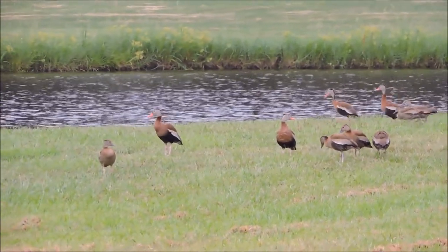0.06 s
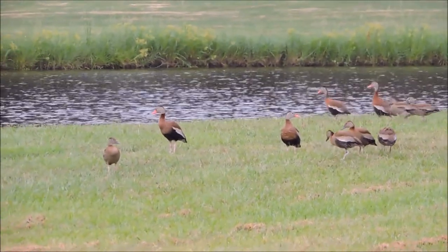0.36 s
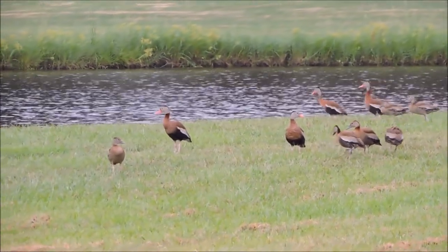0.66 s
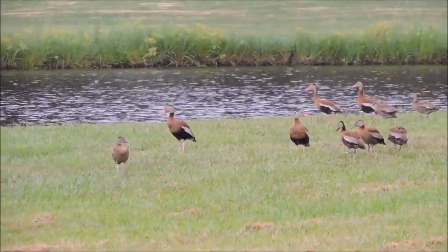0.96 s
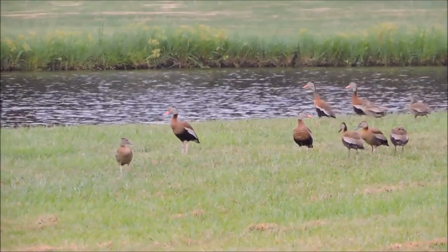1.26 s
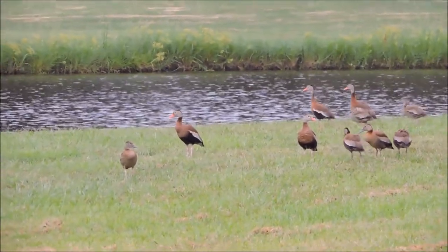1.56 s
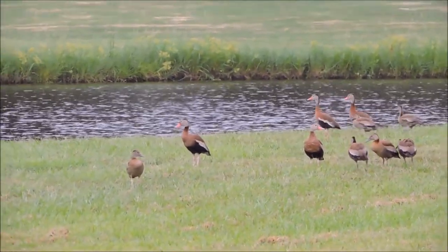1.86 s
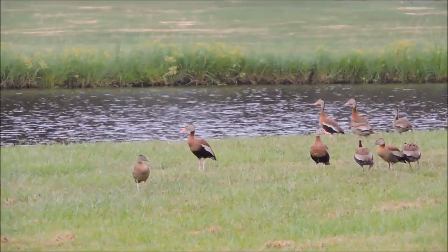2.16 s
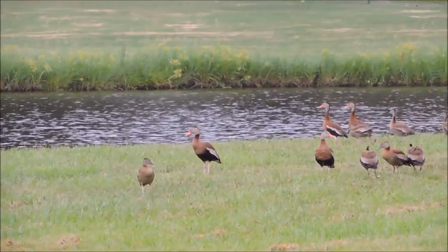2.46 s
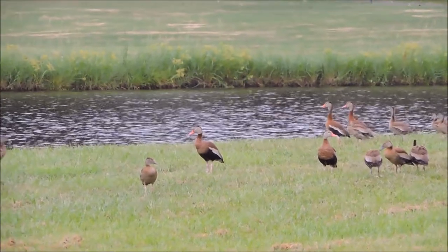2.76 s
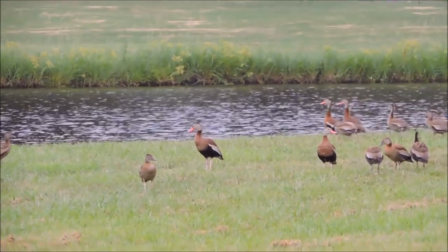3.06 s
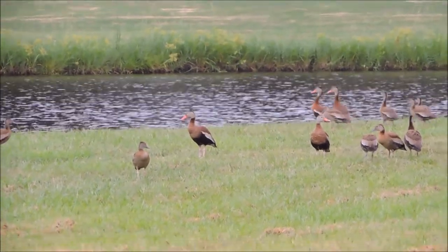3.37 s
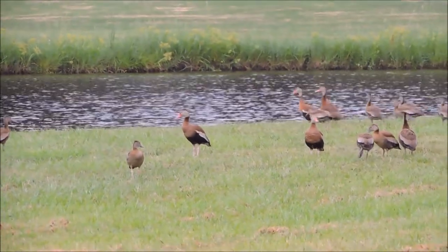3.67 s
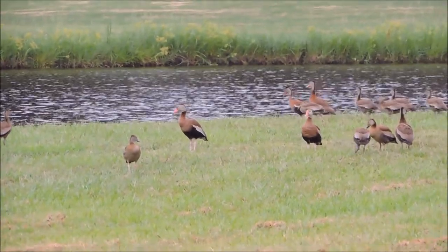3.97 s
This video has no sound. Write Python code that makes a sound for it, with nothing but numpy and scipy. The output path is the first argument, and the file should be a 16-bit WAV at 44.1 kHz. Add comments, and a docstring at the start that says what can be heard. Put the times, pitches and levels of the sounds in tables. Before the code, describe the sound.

A flock of ducks calls on the grass by a pond: quiet peeps, clear wavering whistles, excited squeals, then thin gliding notes. From about a second in, gusts rumble and thump on the microphone, with faint outdoor hiss behind.

```python
"""A flock of whistling ducks on the grass beside a pond opens with soft pips, over faint hiss, insects
and a far hum. Near 0.8 s long whistles begin: each syrinx has two voices, which beat into sum and
difference tones. Gusts soon buffet the microphone, mostly on the left. From 1.9 to 2.6 s an excited
bird's squeals jump between windpipe resonances. Pips and thin gliding notes then close the scene,
while the gusts move toward the middle."""
import sys
import numpy as np
from scipy import signal
from scipy.fft import rfft, irfft, next_fast_len
from scipy.io import wavfile
from scipy.ndimage import uniform_filter1d, map_coordinates

SR = 44100
rng = np.random.default_rng(int(sys.argv[2]) if len(sys.argv) > 2 else 0)


def write(x):
    x = np.atleast_2d(x).T
    wavfile.write(sys.argv[1], SR, np.round(np.clip(x, -1, 1) * 32767).astype(np.int16))


N = 176400

# Noise spectra: (frequency [Hz], relative level [dB])
HISS_SPECTRUM = [(150, -4.5), (400, -2), (950, -12.5), (1450, -12.5), (1950, -20.5), (3700, -21.5),
                 (5000, -28), (9000, -29.5), (11000, -35.5), (15500, -48)]
INSECT_SPECTRUM = [(5900, -23), (6520, -8), (7300, -30.5)]
RUMBLE_SPECTRUM = [(15, -2), (60, 5.5), (135, 0.5), (250, -21), (900, -97)]
FLUTTER_SPECTRUM = [(100, -10), (160, 3.5), (300, -8.5), (600, -30.5), (3000, -100)]
# Swell of the hiss: (time [s], level [dB])
HISS_LEVEL = [(1, -48), (3.2, -45.5)]
# Coherence of the hiss: (frequency [Hz], left-right correlation [ratio])
HISS_COHERENCE = [(60, 1), (700, 0.093)]
# Balance of the hiss: (frequency [Hz], left over right [dB])
HISS_PAN = [(100, -4.5), (1000, 8.5), (2400, 3), (8000, -0.5)]
# Swells of the hum and the breeze: (time [s], level [dB])
HUM_LEVEL = [(0, -67), (.25, -51.5), (1.3, -58.5), (2.2, -46), (2.6, -62.5)]
BREEZE_LEVEL = [(0, -36), (2.5, -26)]
# Gusts: (start [s], length [s], level [dB], left over right [dB])
WIND_GUSTS = [(0.943, 0.037, -28, 16), (1.135, 0.15, -20, 13.5), (1.312, 0.31, -28, 22),
              (1.679, 0.27, -23, 33), (2.04, 0.14, -18, 32), (2.226, 0.11, -19.5, 29),
              (2.591, .16, -15.5, 32), (2.825, 0.283, -18.5, 28), (3.158, 0.12, -21, 8),
              (3.307, 0.1, -18.5, -0.5), (3.654, 0.16, -27.5, -9.5), (3.867, 0.13, -21.5, 1.5)]
# Eddy impacts: (time [s], peak level [dB])
EDDIES = [(1.208, -21.5), (2.166, -14.5), (2.646, -13), (2.752, -15), (2.775, -15.5), (2.82, -10.5),
          (2.914, -10), (3.033, -14.5), (3.113, -14), (3.367, -16)]
# Throat filter: (frequency [Hz], gain [dB])
THROAT_RESPONSE = [(1500, -67), (1950, -21), (2480, -6), (2800, 0.5), (7600, -2.5), (9600, -9),
                   (13500, -2.5), (15500, -25)]
# Source harmonics, from the second upward: (relative level [dB])
WHISTLE_HARMONICS = [3.5, -5.5, -8.5, -20, -19]
PIP_WEE_HARMONICS = [0, 0.67, -17]
SQUEAL_HARMONICS = [-13.5, -29]
# Combination tones: (lower voice [multiple], upper voice [multiple], relative level [dB])
COMBINATION_TONES = [(0, 2, -13), (0, 3, -23), (1, 1, -6), (-1, 2, -10), (2, 1, -15), (2, 0, -8),
                     (3, 0, -13)]
# Single pips: (centre [s], half length [s], top pitch [Hz], lower voice [dB], upper voice [dB])
SINGLE_PIPS = [(0.083, 0.017, 3060, -49, -95), (0.209, 0.011, 2990, -53, -90),
               (.74, 0.043, 3262, -42.5, -39.5), (0.823, 0.025, 4580, -45, -62),
               (3.155, 0.024, 3680, -54, -77), (3.959, 0.024, 7720, -44, -80)]
# Pip-wees: (pip centre [s], tail pitch [Hz], tail length [s], upper voice [Hz], pip [dB], tail [dB])
PIP_WEE_CALLS = [(0.292, 2526, 0.13, 4070, -49.5, -53), (1.172, 2470, 0.079, 4060, -52.5, -56.5),
                 (2.846, 2623, 0.12, 4360, -48.5, -51), (3.776, 2537, .1, 4080, -48.5, -52)]
# Thin notes: (start [s], length [s], start pitch [Hz], end pitch [Hz], level [dB])
THIN_GLIDES = [(0.362, 0.071, 3080, 2820, -57.5), (0.498, 0.2, 3950, 3720, -67),
               (1.664, 0.044, 2430, 2520, -43), (2.848, 0.052, 3290, 3170, -43),
               (2.899, 0.035, 3470, 3220, -47.5), (2.931, 0.075, 3280, 3160, -51.5),
               (3.072, 0.21, 4450, 3850, -69), (3.215, .032, 7500, 5800, -52.5),
               (3.216, .018, 4900, 4500, -58)]
# Whistles: (overtone offset [dB], lower voice, upper voice); voices: (time [s], pitch [Hz], level [dB])
WHISTLE_CALLS = [ (-8.5, [(.8, 1990, -50), (.83, 1668, -54), (.92, 1744, -49.5), (.952, 1980, -44),
                 (.972, 2470, -40), (.99, 2553, -37.5), (1.012, 2496, -41), (1.026, 2790, -42)], []),
                 (-12, [(1.021, 2850, -48), (1.07, 2815, -48), (1.1, 2866, -45), (1.14, 3210, -43.5),
                 (1.18, 3370, -50), (1.202, 3300, -36), (1.22, 2935, -36.5), (1.255, 1764, -47)],
                 [(1.021, 3860, -41.5), (1.066, 3704, -41.5), (1.108, 3970, -40), (1.148, 4690, -36),
                 (1.175, 5090, -35.5), (1.195, 5130, -38), (1.212, 5860, -54)]),
                 (-12.5, [(1.278, 1503, -43), (1.3, 2420, -37.5), (1.33, 2864, -38), (1.403, 2560, -38.5),
                 (1.423, 1990, -43), (1.445, 1640, -53)], []), (-20.5, [(1.455, 1753, -29),
                 (1.472, 2965, -46.5), (1.49, 3380, -41), (1.51, 3520, -34), (1.53, 3385, -32),
                 (1.565, 3300, -33.5), (1.62, 3375, -33.5), (1.636, 2950, -36.5), (1.665, 1770, -47)],
                 [(1.468, 4070, -43), (1.498, 5250, -35), (1.53, 6460, -55)]), (-17.5, [(1.695, 2660, -49),
                 (1.724, 3540, -36), (1.745, 3460, -30.5), (1.762, 3250, -33.5), (1.78, 2910, -37),
                 (1.806, 1870, -40)], [(1.696, 3510, -45), (1.712, 4650, -46.5), (1.757, 6600, -54)]),
                 (-25, [(1.766, 2520, -34), (1.81, 2490, -33), (1.845, 2590, -33), (1.86, 2690, -36),
                 (1.873, 3020, -33), (1.884, 3320, -29), (1.9, 3020, -38), (1.916, 2480, -41)],
                 [(1.772, 3660, -50), (1.81, 3730, -46), (1.85, 3880, -37), (1.868, 4780, -41),
                 (1.892, 5570, -37)]), (-17, [(1.467, 2620, -43), (1.485, 2810, -39.5),
                 (1.505, 2684, -41.5), (1.528, 2550, -41)], [(1.47, 4050, -53), (1.495, 4090, -42.5),
                 (1.53, 3820, -43)]), ]
# Squeals, one contour each: (time [s], driving pitch [Hz], level [dB])
SQUEAL_CALLS = [
    [(1.857, 3000, -34), (1.88, 3380, -46), (1.9, 3550, -28), (1.917, 4220, -30), (1.93, 4870, -40),
     (1.975, 5010, -41), (1.998, 3500, -35.5), (2.012, 3750, -39.5), (2.025, 4280, -26.5),
     (2.056, 4240, -36.5), (2.083, 2150, -38)],
    [(2.117, 2140, -31.5), (2.137, 3610, -32), (2.153, 4210, -28), (2.168, 5020, -40), (2.183, 5160, -34.5),
     (2.19, 5700, -51), (2.215, 6110, -36), (2.238, 6460, -34), (2.258, 6190, -37), (2.29, 2540, -41)],
    [(2.29, 2460, -38), (2.302, 2840, -30), (2.315, 3755, -29), (2.335, 4580, -26), (2.346, 5830, -35),
     (2.36, 6080, -30.5), (2.38, 5670, -37), (2.392, 4950, -44), (2.408, 3680, -40), (2.422, 2240, -44)],
    [(2.428, 2000, -29), (2.446, 3170, -35), (2.46, 4080, -23.5), (2.47, 4700, -31.5), (2.482, 4720, -34.5),
     (2.494, 5430, -41), (2.508, 4600, -44), (2.52, 3580, -38.5), (2.54, 2220, -48)],
    [(2.568, 2040, -30), (2.583, 2860, -36), (2.597, 3920, -29), (2.623, 3560, -35), (2.64, 2100, -46)],
]
# Windpipe resonances: (frequency [Hz])
WINDPIPE_MODES = [2670, 3410, 3815, 4570, 5020, 5860, 6320]
# Hoarse subtones: (driving pitch [multiple], relative level [dB])
SUBTONES = [(.5, -1), (.75, -21), (1.25, -41), (1.501, -22.5)]

BAND_LIMIT_HZ = 15720


def amp(db):
    """Amplitude ratio of a level in decibels."""
    return 10 ** (np.asarray(db) / 20)


def unit(x):
    """Normalisation to an rms of 1."""
    return x / np.sqrt(np.mean(x ** 2) + 1e-20)


def along(points, hz):
    """Interpolation of (frequency [Hz], value) points on a logarithmic axis."""
    f, v = np.transpose(points)
    return np.interp(np.log(np.abs(hz) + 1), np.log(f + 1), v)


def curves(rows, t):
    """Linear interpolation in time of each column after the first."""
    times, *columns = np.transpose(rows)
    return [np.interp(t, times, column) for column in columns]


def wobble(rate, size=N):
    """Random modulation: a smooth curve with `rate` knots a second."""
    knots = rng.standard_normal(int(N * rate / SR) + 4)
    return map_coordinates(knots, [np.arange(size) * rate / SR])


def filtered(x, response):
    """Linear filtering: the spectrum of x times a frequency response."""
    size = next_fast_len(N + SR // 4)
    return irfft(rfft(x, size) * response(np.fft.rfftfreq(size, 1 / SR)), size)[..., :N]


def noise(spectrum):
    """Spectral shaping of two independent noises, at an rms of 1."""
    return unit(filtered(rng.standard_normal((2, N)), lambda hz: amp(along(spectrum, hz))))


def hiss(t):
    """Partial coherence: outdoor hiss is alike on both sides only in the bass."""
    angle = lambda hz: np.arccos(np.clip(along(HISS_COHERENCE, hz), -1, 1)) / 2
    weights = lambda hz: np.array([np.cos(angle(hz)), np.sin(angle(hz))])
    balance = lambda hz: amp(along(HISS_PAN, hz) * np.array([[.5], [-.5]]))
    mid, side = filtered(noise(HISS_SPECTRUM), weights)
    return filtered(np.array([mid + side, mid - side]), balance) * amp(curves(HISS_LEVEL, t)[0])


def insects():
    """Narrow-band noise: an insect chorus with a flickering level."""
    mid, side = noise(INSECT_SPECTRUM)
    return amp(-63.5 + 1.7 * wobble(23.1)) * (mid + .5 * side * np.array([[1], [-1]]))


def hum(t, pitch_hz=411.3):
    """Amplitude and frequency modulation make a far tone waver."""
    rms = amp(curves(HUM_LEVEL, t)[0] + 2.6 * wobble(9.11))
    hz = pitch_hz + 3 * wobble(14)
    return np.sqrt(2) * rms * np.sin(2 * np.pi * np.cumsum(hz) / SR)


def wind(t, rise_s=0.0063, decay_s=0.018):
    """Turbulence: gusts and breeze add in power and break on each microphone port in lumps."""
    power = np.ones((2, 1)) * amp(curves(BREEZE_LEVEL, t)[0]) ** 2
    for start, length, db, pan in WIND_GUSTS:
        attack = np.clip((t - start) / rise_s, 0, 1)
        decay = np.exp(-np.maximum(t - start - length, 0) / decay_s)
        ports = amp([pan / 2, -pan / 2]) ** 2
        power += (2 * ports / ports.sum())[:, None] * (amp(db) * attack * decay) ** 2
    flow = np.sqrt(power)
    lumps = np.array([wobble(35), wobble(35)])
    rumble = unit(noise(RUMBLE_SPECTRUM) * amp(1.63 * lumps))
    flutter = unit(noise(FLUTTER_SPECTRUM) * amp(2.8 * lumps + 3.2 * wobble(80)))
    # Flutter lies 12 dB under the rumble of a -20 dB gust and grows faster than the gust.
    return rumble * flow + amp(-12) * flutter * (10 * flow) ** 1.72 / 10


def thumps(t, width_s=0.0012, right_db=-30):
    """Pressure pulses: each eddy that hits the left port makes one bipolar swing."""
    swing = lambda u: np.pi * u / (1 + u * u) ** 2
    return sum(amp(db) * swing((t - s) / width_s) for s, db in EDDIES) * amp([[0], [right_db]])


def banks(x, t60_s=0.21):
    """Scattering from the pond's banks: a short, exponentially decaying tail."""
    t = np.arange(SR // 2) / SR
    tail = rng.standard_normal((2, len(t))) * amp(-60 * t / t60_s)
    return signal.fftconvolve(x[None], tail / np.linalg.norm(tail[0]), axes=1)[:, :N]


def breath(calls, db):
    """Turbulent air noise follows the rms envelope of the calls."""
    envelope = np.sqrt(np.abs(uniform_filter1d(calls ** 2, size=200)))
    return amp(db) * envelope * noise([(1600, -4), (2600, -4), (8000, -3), (16000, -26)])[0]


def span(rows):
    """Sample indices over a note's duration."""
    return np.arange(max(0, int(rows[0][0] * SR)), min(N, int(rows[-1][0] * SR)))


def voice(rows, i, glide_s=0.0072, edge_s=0.0018, jitter=0.0026, shimmer_db=1.45):
    """Jitter and shimmer: the slightly unsteady pitch and gain of one voice of the syrinx."""
    t = i / SR
    hz, db = curves(rows, t)
    hz = uniform_filter1d(hz, int(glide_s * SR), mode="nearest")
    hz *= 1 + jitter * wobble(289, len(i))
    gain = amp(db + shimmer_db * wobble(197, len(i)))
    gate = np.clip(np.minimum(t - rows[0][0], rows[-1][0] - t) / edge_s, 0, 1)
    return hz, gain * np.sin(gate * np.pi / 2) ** 2


def partial(hz):
    """Source and filter: the throat weights a gliding sinusoid by its frequency."""
    gain = amp(along(THROAT_RESPONSE, hz)) * (np.abs(hz) < BAND_LIMIT_HZ)
    return gain * np.sin(2 * np.pi * np.cumsum(hz) / SR)


def syrinx(out, lower, upper=(), harmonics=WHISTLE_HARMONICS, overtone_db=0, sheen_db=-27):
    """Add a note to out; with two voices, nonlinear mixing yields sum and difference tones."""
    i = span(lower)
    low_hz, low_gain = voice(lower, i)
    out[i] += low_gain * partial(low_hz)
    for k, db in enumerate(harmonics, start=2):
        flicker_db = 1.5 * wobble(87.2, len(i))
        out[i] += low_gain * amp(db + overtone_db + flicker_db) * partial(k * low_hz)
    if len(upper):
        high_hz, high_gain = voice(upper, i)
        out[i] += high_gain * partial(high_hz)
        # High sum tones give a raspy sheen.
        sheen = [(m, n, sheen_db + overtone_db / 2) for m, n in [(1, 2), (2, 2), (3, 1), (1, 3)]]
        mixed_gain = np.sqrt(low_gain * high_gain) * amp(overtone_db * 0.09)
        harmonic_gain = high_gain * amp(overtone_db * 1.7)
        for m, n, db in COMBINATION_TONES + sheen:
            hz = (m * low_hz + n * high_hz) * (1 + .005 * wobble(1300, len(i)))
            out[i] += amp(db) * (mixed_gain if m else harmonic_gain) * partial(hz)


def arch(s, half_s, hz, db, fall, edge_db=-11):
    """Parabolic contour of pitch and level; the ends lie lower in pitch by the fraction `fall`."""
    return [(s + u * half_s, hz * (1 - fall * u * u), db + edge_db * u * u)
            for u in np.linspace(-1, 1, 9)]


def pips(upper_ratio=1.455, top_hz=3056, dip_ratio=.895):
    """Frequency modulation: short two-voiced arches, some dipping into a sagging "wee" tail."""
    out = np.zeros(N)
    for s, half_s, hz, db, upper_db in SINGLE_PIPS:
        lower = arch(s, half_s, hz, db, fall=0.19)
        upper = arch(s, half_s, upper_ratio * hz, upper_db, fall=0.33)
        syrinx(out, lower, upper, overtone_db=-13)
    for s, tail_hz, length, upper_hz, db, tail_db in PIP_WEE_CALLS:
        pip = arch(s, .034, top_hz, db, fall=.24, edge_db=-7)[:-1]
        dip_hz = dip_ratio * tail_hz
        dip = [(s + .03, 1.1 * dip_hz, db - 2.5), (s + .043, dip_hz, db + 1.5)]
        tail = [(s + .068 + u * length, tail_hz * (1 - 0.15 * u ** 1.5), tail_db - 9.5 * u)
                for u in np.linspace(0, 1, 5)]
        upper = arch(s, 0.022, upper_hz, db + 11, fall=0.2)
        syrinx(out, pip + dip + tail, upper, PIP_WEE_HARMONICS)
    return out


def whistles():
    """Sustained oscillation of the syrinx: long, clear whistles and thin gliding notes."""
    out = np.zeros(N)
    for db, lower, upper in WHISTLE_CALLS:
        syrinx(out, lower, upper, overtone_db=db, sheen_db=-10)
    for s, length, start_hz, end_hz, db in THIN_GLIDES:
        syrinx(out, [(s, start_hz, db), (s + length, end_hz, db - 0.5)], overtone_db=-23)
    return out


def squeals(pull=.7, detuned_db=-7, jitter_hz=26, roughness=.12):
    """Frequency pulling: a hoarse sweep clings to one windpipe resonance, then jumps to the next."""
    out, modes = np.zeros(N), np.array(WINDPIPE_MODES)
    for rows in SQUEAL_CALLS:
        i = span(rows)
        shake = lambda: wobble(1700, len(i))
        drive_hz, gain = voice(rows, i)
        detuning = drive_hz - modes[np.abs(drive_hz[:, None] - modes).argmin(axis=1)]
        hz = drive_hz - pull * detuning + jitter_hz * shake()
        gain *= amp(detuned_db * np.minimum((detuning / 300) ** 2, 1))  # weaker between resonances
        gain *= 1 + roughness * shake()
        fade = np.minimum(modes[2] / hz, 1) ** 2  # purer above the third resonance
        overtones = sum(amp(db) * partial(k * hz) for k, db in enumerate(SQUEAL_HARMONICS, start=2))
        subtones = sum(amp(db) * partial(k * drive_hz * (1 + .008 * shake())) for k, db in SUBTONES)
        out[i] += gain * (partial(hz) + overtones * fade ** 2 + subtones * fade)
    return out


def scene():
    """Superposition of the flock, its reflections, the wind and the background."""
    t = np.arange(N) / SR
    clear, rough = whistles() + pips(), squeals()
    clear += breath(clear, db=-21.5)
    rough += breath(rough, db=-18.5)
    flock = clear + rough * amp([[.9], [-.9]])  # squeals slightly to the left
    reflections = amp(-10.5) * banks(clear + rough)
    return flock + reflections + wind(t) + thumps(t) + hiss(t) + insects() + hum(t)


def record(dry):
    """Ideal low-pass filtering: nothing above the band limit remains."""
    return filtered(dry, lambda hz: hz < BAND_LIMIT_HZ)


dry = scene()
out = record(dry)
write(out)
```